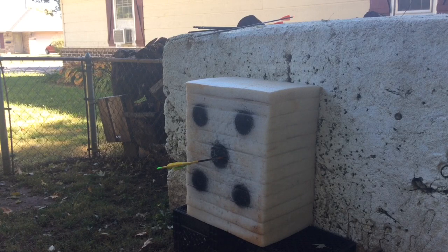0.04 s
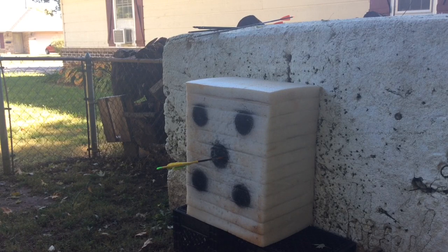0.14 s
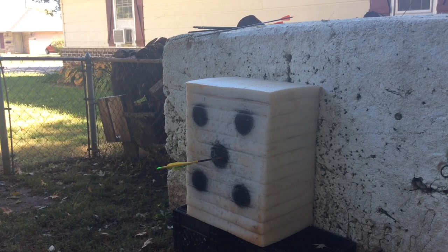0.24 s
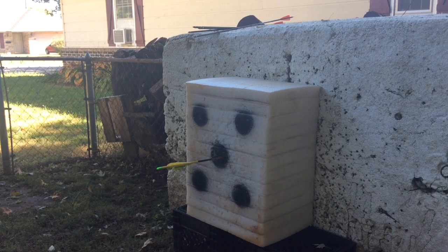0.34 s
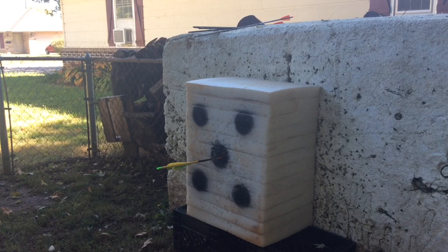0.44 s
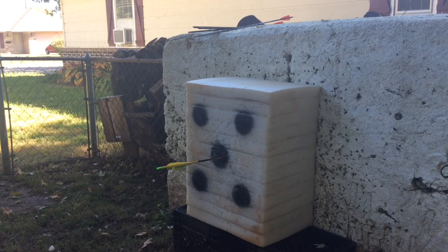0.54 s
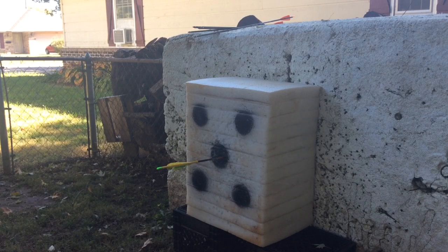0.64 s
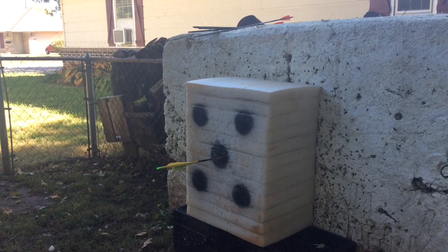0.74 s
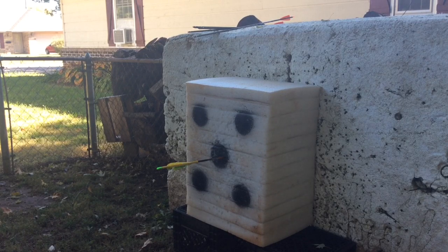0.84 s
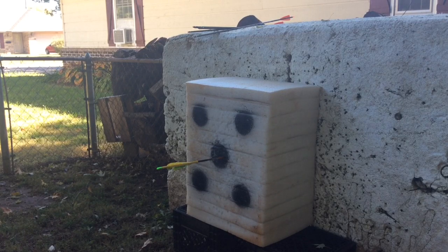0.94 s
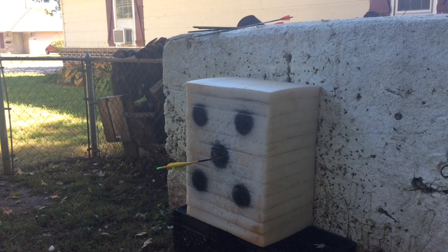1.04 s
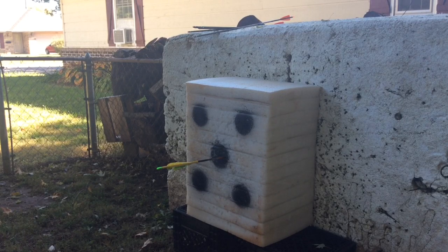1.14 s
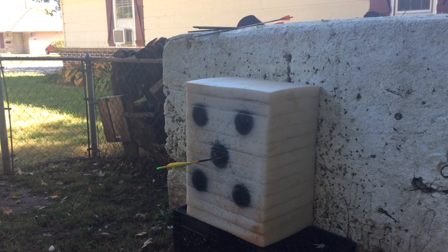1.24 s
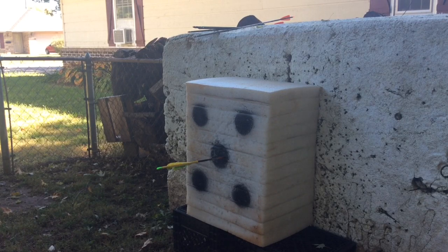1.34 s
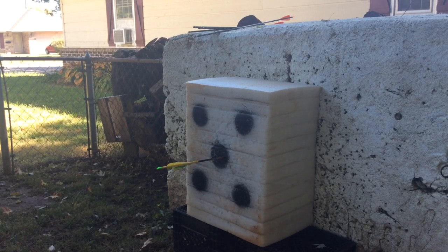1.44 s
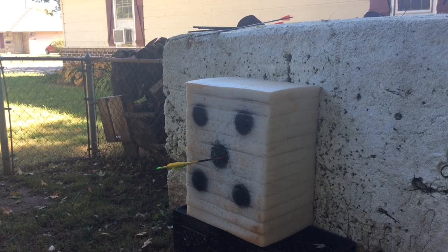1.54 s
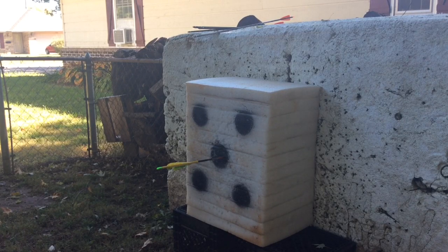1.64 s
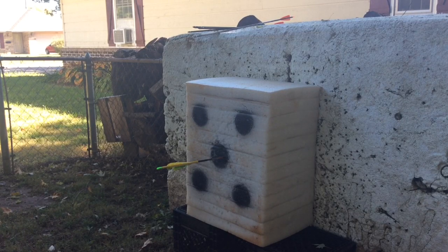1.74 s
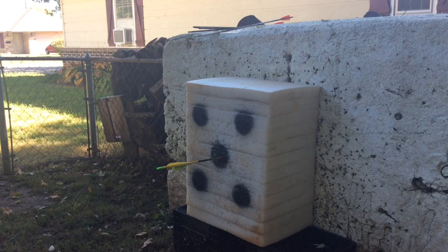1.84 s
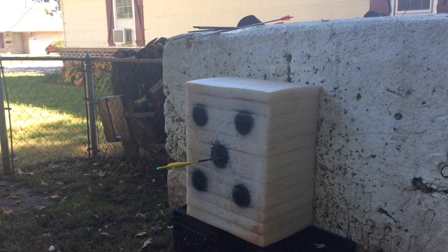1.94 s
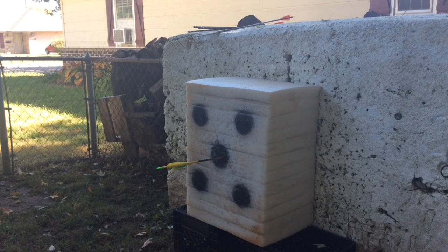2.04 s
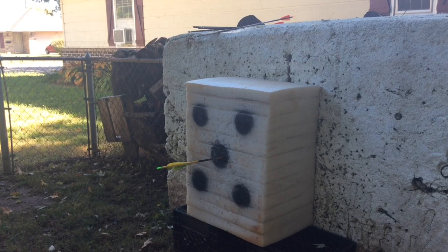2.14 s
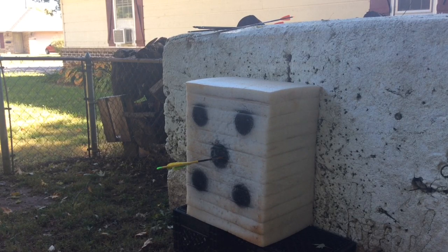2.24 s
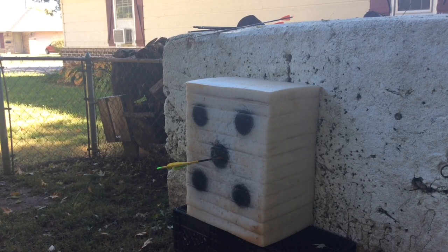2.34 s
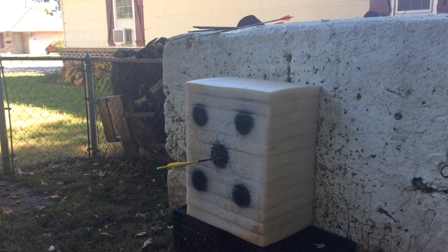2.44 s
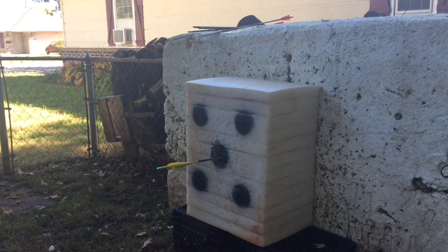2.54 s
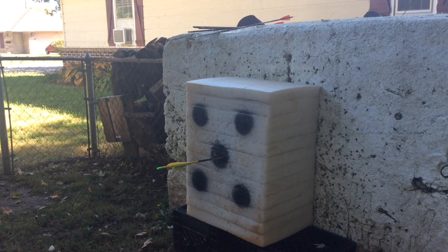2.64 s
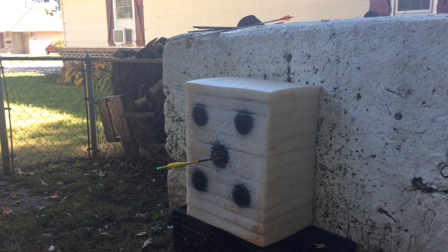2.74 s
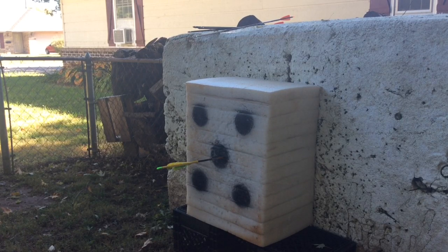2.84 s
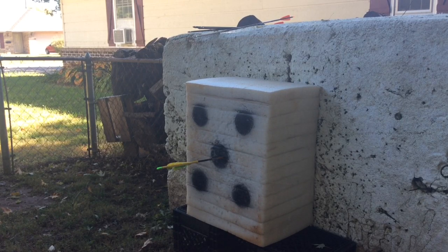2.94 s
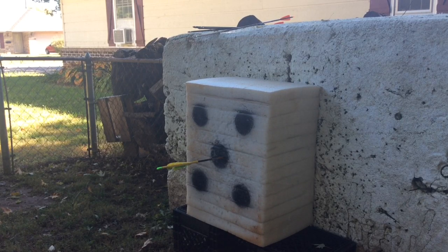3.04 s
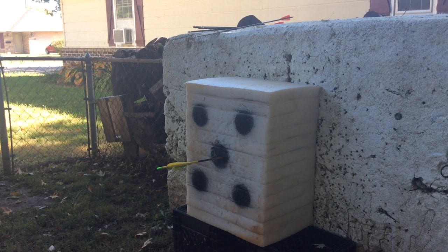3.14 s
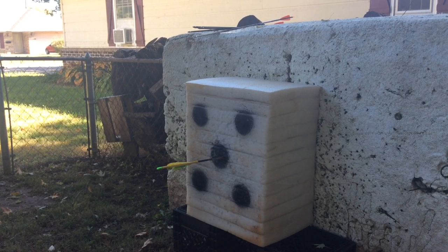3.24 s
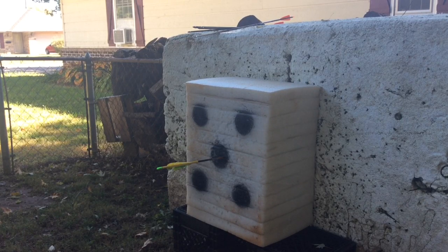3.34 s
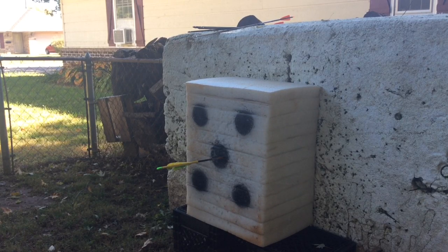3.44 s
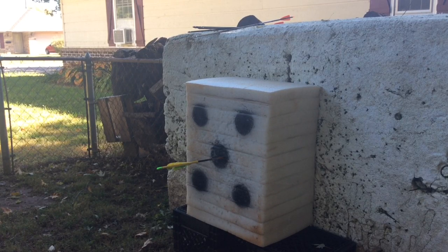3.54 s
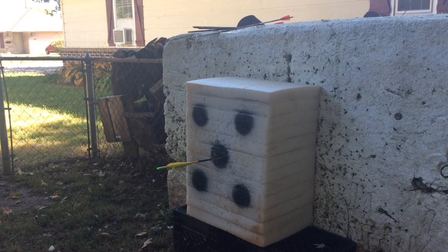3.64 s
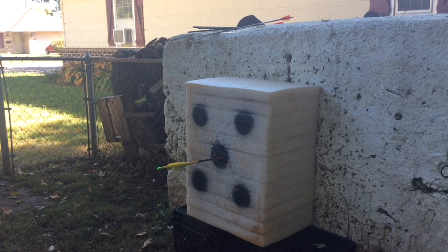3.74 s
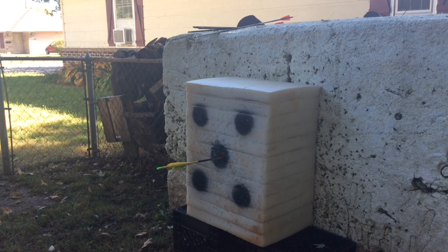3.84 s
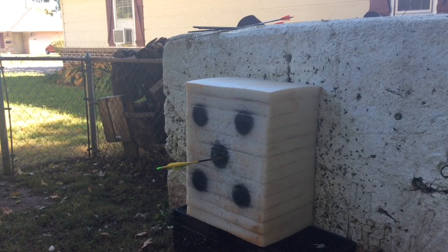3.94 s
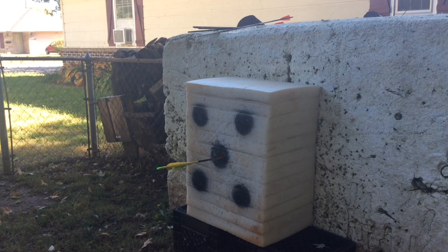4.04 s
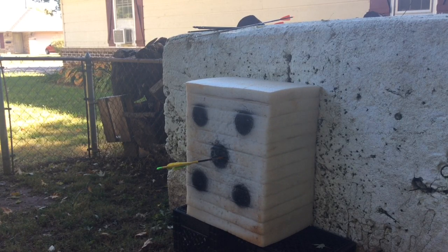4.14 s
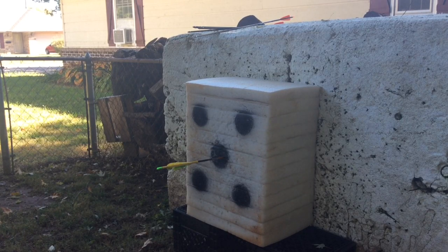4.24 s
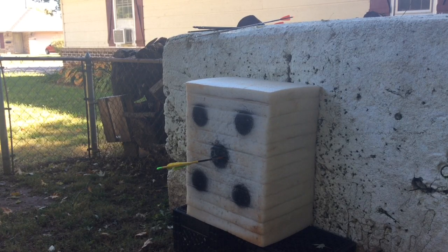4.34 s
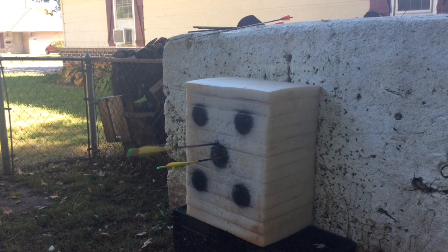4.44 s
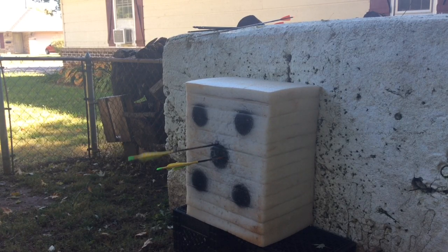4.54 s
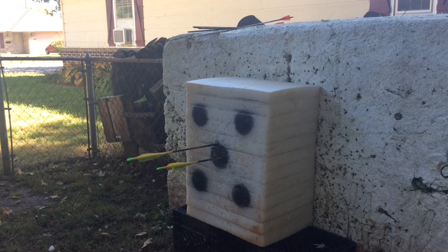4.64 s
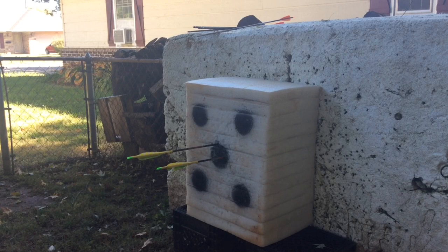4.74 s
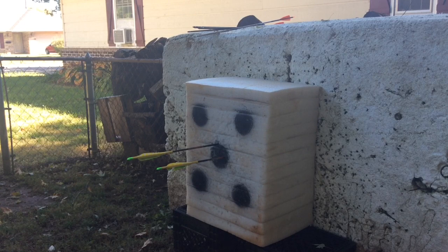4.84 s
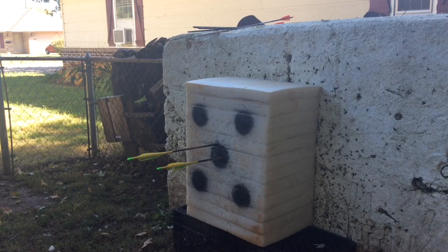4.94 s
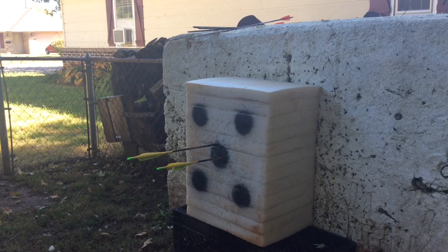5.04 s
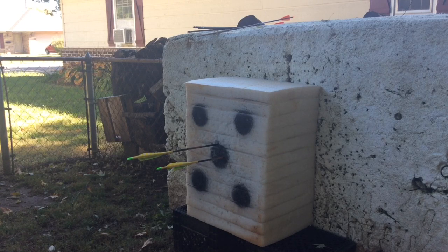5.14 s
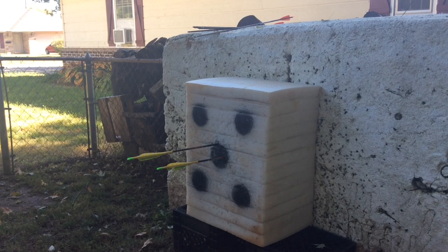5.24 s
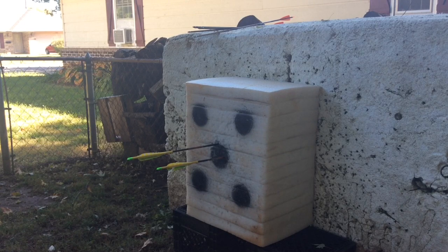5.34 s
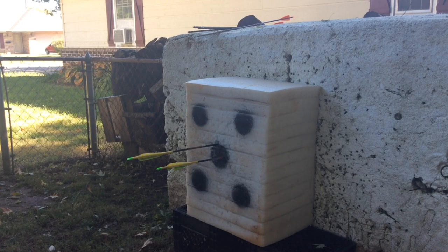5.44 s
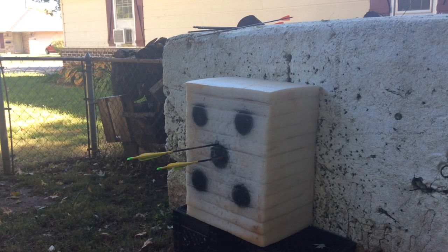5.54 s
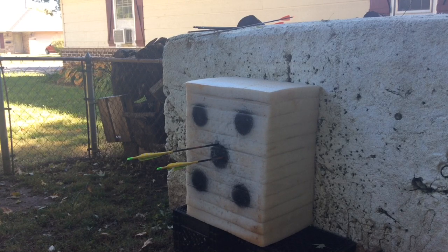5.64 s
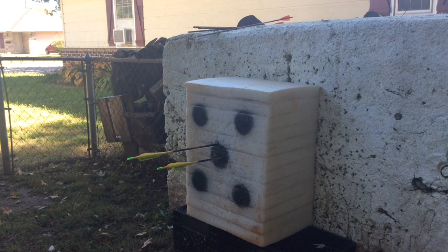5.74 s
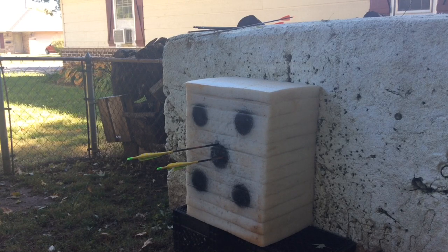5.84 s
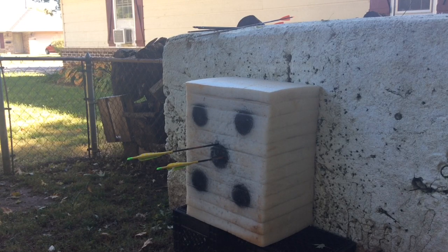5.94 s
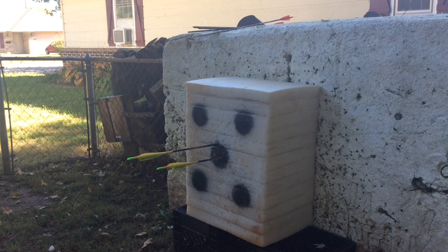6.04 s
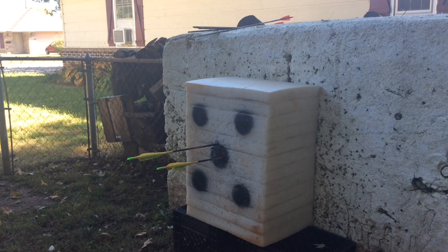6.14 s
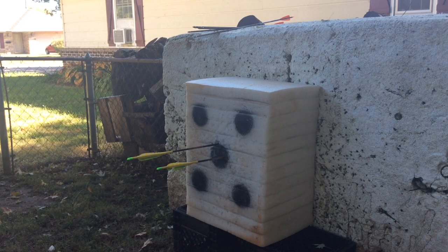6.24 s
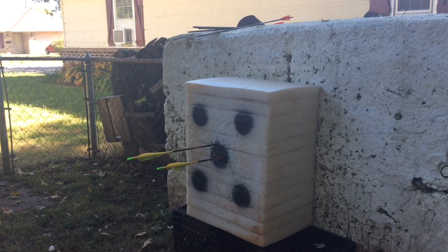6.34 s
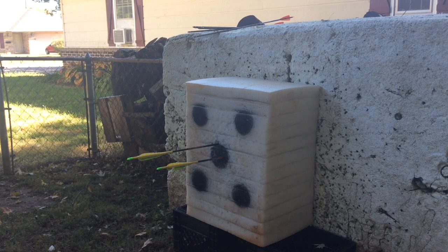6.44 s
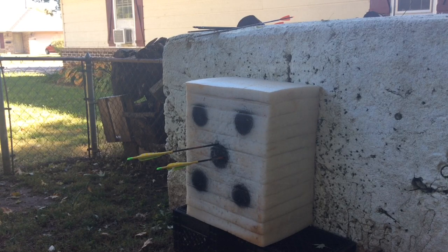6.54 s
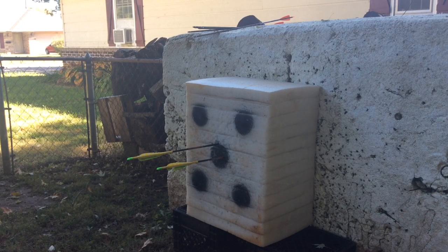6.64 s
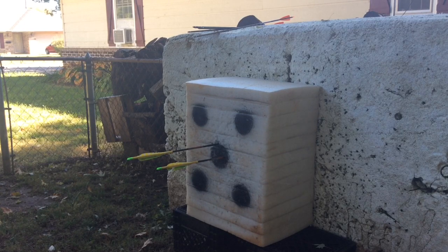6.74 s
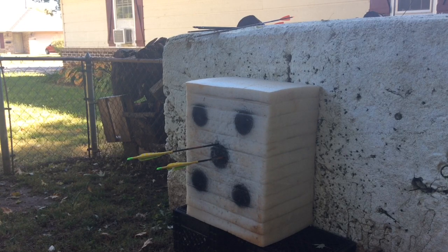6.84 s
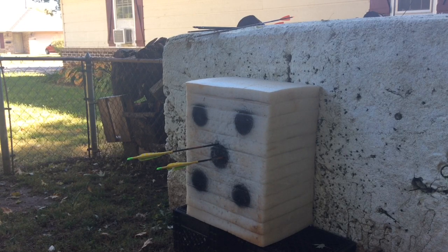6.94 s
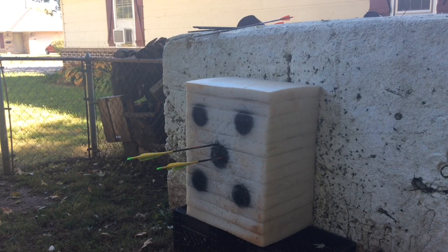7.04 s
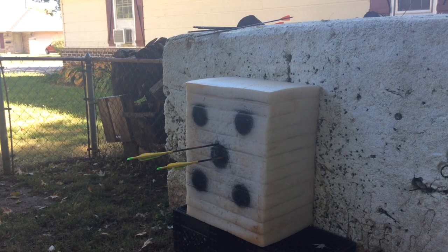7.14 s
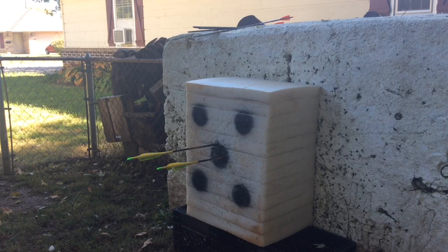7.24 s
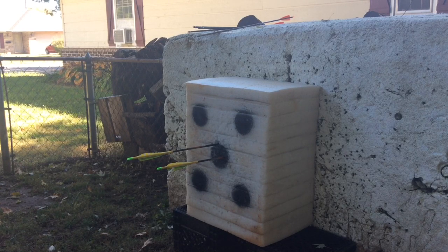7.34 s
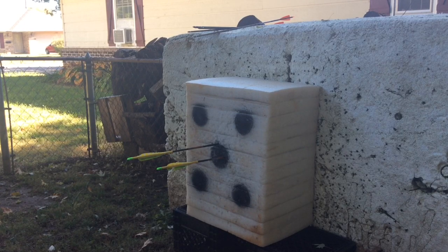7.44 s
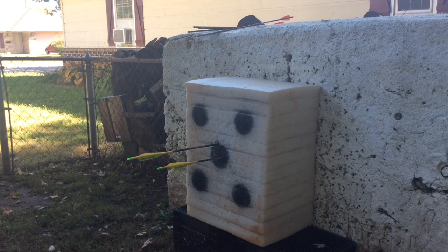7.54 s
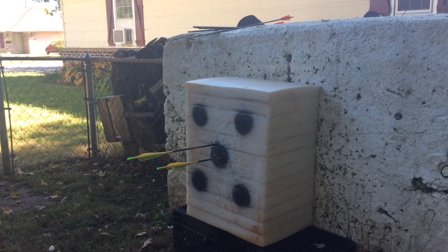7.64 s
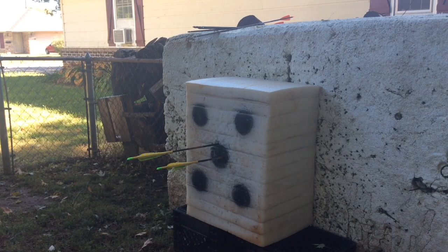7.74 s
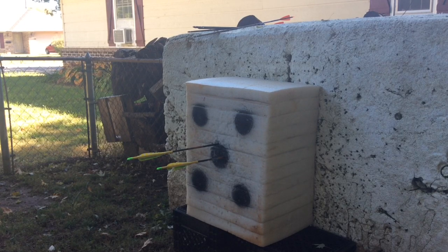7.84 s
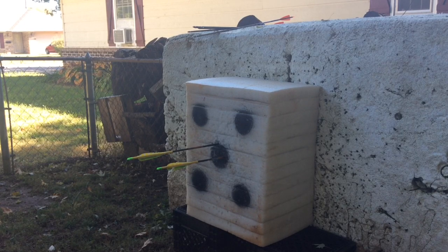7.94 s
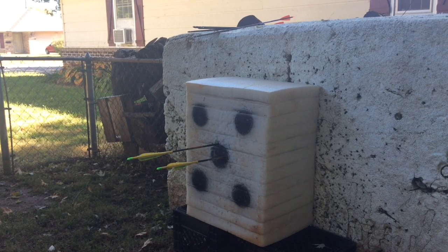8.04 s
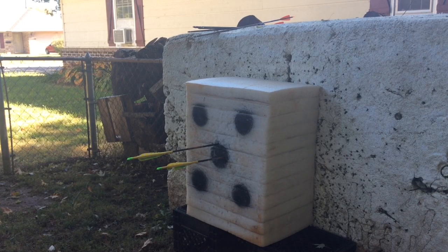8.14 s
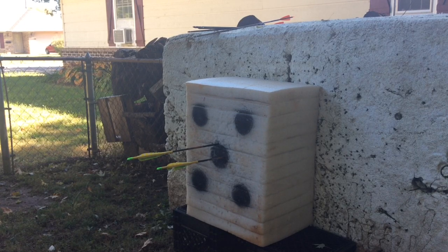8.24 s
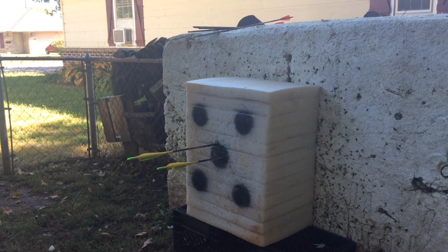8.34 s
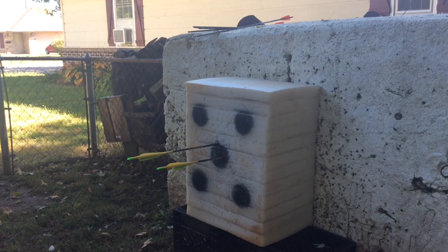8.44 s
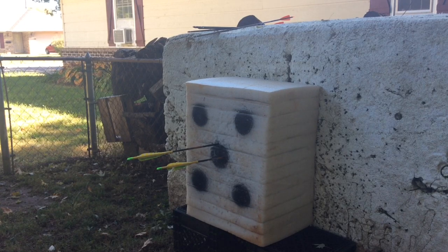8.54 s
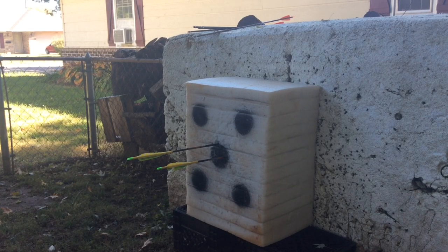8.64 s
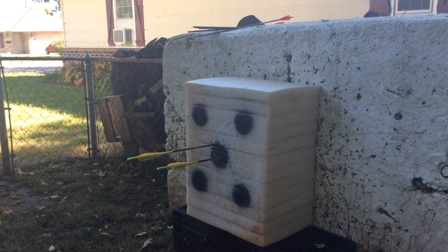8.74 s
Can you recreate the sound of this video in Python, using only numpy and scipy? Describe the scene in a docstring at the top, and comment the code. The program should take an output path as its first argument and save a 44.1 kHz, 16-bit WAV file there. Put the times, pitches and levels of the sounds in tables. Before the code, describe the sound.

Crickets trill over faint distant traffic, then a bowstring slaps and an arrow slams into a foam block with a loud, overloaded thwack.

```python
"""Crickets trill near and far over distant traffic, as bands of modulated noise and pulsed tones; dry leaves rustle.
A bow is loosed: string slaps ring the limbs, then the arrow comes in as vane hiss and shaft hum.
It thumps into a layered foam block beside the microphone: the tip cracks the skin and rings the shaft, then the
braking shoves boom the block, overloading the recorder. Yard clutter and house walls answer, and leaves rustle again."""
import sys
import numpy as np
from scipy import signal
from scipy.fft import rfft, irfft, next_fast_len
from scipy.io import wavfile
from scipy.ndimage import uniform_filter1d

SR = 44100
rng = np.random.default_rng(int(sys.argv[2]) if len(sys.argv) > 2 else 0)


def waveform_to_disk(signal):
    """Save audio, clipped to [-1, 1], as 16-bit WAV at the path in sys.argv[1]."""
    frames = np.transpose(np.atleast_2d(signal))
    scaled = np.clip(frames, -1, 1) * 32767
    samples = np.round(scaled).astype(np.int16)
    wavfile.write(sys.argv[1], SR, samples)


def undo_db(level):
    """Turn decibels back into plain size, where 20 dB means ten times bigger."""
    steps = np.asarray(level, float) / 20
    return 10 ** steps


N = 387633
T = np.arange(N) / SR
FFT_LENGTH = next_fast_len(N)

# tip breaking through the skin and first layers: start_s [s], level_db [dB]
TIP_BLOWS = [(4.5309, -10), (4.533, 0.2)]
# shaft modes: frequency_hz [Hz], level_db [dB], t60_s [s]
SHAFT_MODES = [(1080, 1, 0.014), (1250, -10.5, .012), (1660, -3, 0.01), (2030, -3, 0.0092),
               (2720, -1, 0.0086), (3270, -4, 0.006), (4280, 2, 0.0096), (5240, -14, 0.0073),
               (7550, -12, 0.0068), (9200, -14, 0.005), (10800, -15, 0.0043), (13500, -21, 0.004)]
# shoves as the arrow brakes and the block rocks: start_s [s], level_db [dB], contact_ms [ms]
BLOCK_SHOVES = [(4.5362, -3.5, 1.62), (4.5395, -1, 1.33), (4.5426, -4, 0.79), (4.5449, -1.5, 0.17),
                (4.580, -19.5, 2.5), (4.599, -17, 3.6)]
# foam block modes: frequency_hz [Hz], level_db [dB], t60_s [s]
BLOCK_MODES = [(138, -15, .16), (170, 2.5, 0.11), (223.6, -5, 0.077), (265, -7.5, 0.043), (323, -4, 0.048),
               (441, 0, 0.027), (544, -0.5, 0.036), (684, -2, .035), (830, -21.5, .03),
               (1006, -19.5, 0.027), (1640, -6.5, .02)]


def impact():
    """Modal excitation: short forces ring the shaft and boom the block, while fracture and tearing make noise."""
    tip_force = sum(push(start_s, level_db, 0.071) for start_s, level_db in TIP_BLOWS)
    shove_force = sum(push(start_s, level_db, ms) for start_s, level_db, ms in BLOCK_SHOVES)
    shaft = ring(tip_force, SHAFT_MODES)
    block = ring(shove_force, BLOCK_MODES)
    # noise spectra: (Hz, relative dB per Hz)
    crack_noise = coloured([(300, -0.5), (1500, 5), (5000, -0.5), (15500, -15.5)])
    tear_noise = coloured([(150, -22), (600, 11), (1200, -10.5), (3000, -23), (15500, -38.5)])
    crack = burst(TIP_BLOWS[0][0], -2.5, 0.0002, 0.0071) * crack_noise
    tear = burst(BLOCK_SHOVES[0][0], -11, 0.004, 0.085) * tear_noise
    # a small block radiates its slowest motion poorly
    body = highpass(highpass(shaft + block + tear, 133), 115)
    return body + crack


# arrow in flight: time_s [s], hiss_db [dB], hum_hz [Hz], hum_db [dB]
ARROW_FLIGHT = [(4.41, -56, 488, -57), (4.426, -38, 484, -40.5), (4.482, -42, 487, -45),
                (4.5, -36.5, 454, -42), (4.518, -39, 432, -38), (4.527, -27.5, 434, -40)]
# vane hiss spectrum: frequency_hz [Hz], density_db [relative dB per Hz]
VANE_SPECTRUM = [(600, 2.5), (1500, -9.5), (3000, -6), (5000, -7.5), (9000, -6.5), (15000, -6.5)]


def flight():
    """Aeroacoustic noise and flexural vibration: vanes hiss, and the shaft hums lower as it nears."""
    hum_phase = 2 * np.pi * np.cumsum(curve(ARROW_FLIGHT, column=2)) / SR
    hum = undo_db(curve(ARROW_FLIGHT, column=3)) * np.sin(hum_phase)
    hiss_db = curve(ARROW_FLIGHT, column=1) + 1.3 * walk(60)
    hiss = undo_db(hiss_db) * coloured(VANE_SPECTRUM)
    return (hum + hiss) * inside(ARROW_FLIGHT, 0.004)


# string slaps at the release: start_s [s], thunk_db [dB], hiss_db [dB], contact_ms [ms]
STRING_SLAPS = [(4.382, -43, -49, .2), (4.393, -34, -34.5, 0.3), (4.399, -23.5, -28, 0.36),
                (4.4034, -30, -31, 0.22), (4.4087, -31, -37, 0.14), (4.4127, -26.5, -45.5, 0.97)]
# bow modes: frequency_hz [Hz], level_db [dB], t60_s [s]
BOW_MODES = [(60, 1.5, .1), (135.3, 5, 0.055), (210, -4.5, 0.033), (474, -18, .12), (830, -30, .15),
             (2130, -17, .05), (2680, -2, 0.054), (3870, -3, .02)]
# slap hiss spectrum: frequency_hz [Hz], density_db [relative dB per Hz]
STRING_SPECTRUM = [(700, -3.5), (2500, -1.5), (4000, -0.5), (8000, -3.5), (12000, -5), (15500, -20.5)]


def bow():
    """Impulsive modal excitation: the string slaps the limbs with a dull thunk, a twang and puffs of hiss."""
    slap_force = sum(push(start_s, thunk_db, ms) for start_s, thunk_db, _, ms in STRING_SLAPS)
    thunk = ring(slap_force, BOW_MODES)
    puffs = sum(burst(start_s, hiss_db, 0.00084, 0.078) for start_s, _, hiss_db, _ in STRING_SLAPS)
    return highpass(thunk, 70) + puffs * coloured(STRING_SPECTRUM)


# near clutter tails: lowest_hz [Hz], level_db [dB], t60_s [s]
CLUTTER_TAILS = [(350, -28.5, 0.41), (1800, -26.5, 0.15), (7000, -12.5, 0.16)]
# house wall echoes: delay_s [s], level_db [dB], brightest_hz [Hz]
WALL_ECHOES = [(.030, -34.5, 5000), (0.051, -38, 5000), (0.166, -23.5, 200), (.167, -46, 2500),
               (.208, -49, 2500), (.225, -51, 210)]


def yard(source):
    """Reflection and scattering: near clutter gives short bright tails, house walls late dull slaps."""
    out = source
    for lowest_hz, level_db, t60_s in CLUTTER_TAILS:
        out = out + undo_db(level_db) * highpass(scatter(source, t60_s), lowest_hz)
    for delay_s, level_db, brightest_hz in WALL_ECHOES:
        delayed = np.roll(source, int(delay_s * SR))
        out = out + undo_db(level_db) * lowpass(delayed, brightest_hz)
    return out


# near trills, a neighbour overlapping the first:
# first_stroke_middle_s [s], end_s [s], pitch_hz [Hz], level_db [dB]
NEAR_TRILLS = [(.0556, .6, 3910, -52), (.068, .5, 3774, -56), (1.0668, 1.12, 3870, -53),
               (1.191, 1.49, 3920, -49.5), (2.109, 2.54, 3848, -48.5), (3.2502, 3.64, 3905, -50.5),
               (4.8322, 5.25, 3925, -51.5), (7.0186, 7.43, 3886, -50.5), (8.65, 8.9, 3920, -52.5)]


def near_crickets():
    """Stridulation: distinct wing strokes pulse a tone, slowing through each trill as the insect tires."""
    strokes_per_s, slowing_per_s2, stroke_duty = 40.5, 4, 0.6
    swell_s, first_share, fade_s = 0.1, 0.85, 0.06
    song = 0
    for first_s, end_s, pitch_hz, level_db in NEAR_TRILLS:
        t = np.maximum(T - first_s, -1)
        phase = strokes_per_s * t - slowing_per_s2 * t ** 2 / 2 + stroke_duty / 2
        swell = np.clip(first_share + t / swell_s, 0, 1)
        fade = np.clip((end_s - T) / fade_s + 0.5, 0, 1)
        pulses = strokes(phase, pitch_hz, stroke_duty, 1.7, 25, 150)
        song = song + (phase > 0) * swell * fade * undo_db(level_db) * pulses
    return song + undo_db(2.0) * blur(song, curve(NEAR_TRILLS, column=2), 220, 0.081)


# far trills: start_s [s], end_s [s], pitch_hz [Hz], level_db [dB]
DISTANT_TRILLS = [(-.1, .42, 4150, -53), (.86, 1.33, 4150, -60), (1.56, 2.38, 4150, -57.5),
                  (2.86, 3.48, 4180, -59), (3.74, 4.15, 4110, -55), (4.7, 5.22, 4150, -58.5),
                  (5.68, 6.05, 4150, -53.5), (6.65, 6.98, 4205, -55.5), (7.15, 7.38, 4090, -62),
                  (7.58, 8.18, 4150, -55), (8.6, 8.9, 4150, -56)]


def far_crickets():
    """Stridulation with long scattering: the song swells, its strokes run together and it is blurred more."""
    strokes_per_s, swell_s, fade_db_per_s = 48, 0.092, 147
    envelope = 0
    for start_s, end_s, _, level_db in DISTANT_TRILLS:
        swell = np.clip((T - start_s) / swell_s, 0, 1)
        envelope = envelope + swell * undo_db(level_db - fade_db_per_s * np.maximum(T - end_s, 0))
    pitch_hz = curve(DISTANT_TRILLS, column=2)
    phase = np.cumsum(strokes_per_s + 1.6 * walk(3.6)) / SR
    song = envelope * undo_db(1.5 * walk(6.4)) * strokes(phase, pitch_hz, 0.99, 1.6, 9.1, 75)
    return song + undo_db(1.5) * blur(song, pitch_hz, 180, 0.27)


def cricket_chorus():
    """Incoherent superposition: many crickets farther still merge into a wavering narrow band."""
    pitch_hz, width_hz, level_db = 4150, 520, -67.5
    return blur(undo_db(level_db + 3.2 * walk(3.07)), np.full(N, pitch_hz), width_hz, 0.2)


# dry leaves rustling: start_s [s], level_db [dB], rise_s [s], t60_s [s], tilt_db [dB per octave]
LEAF_RUSTLES = [(.787, -40, .007, 0.066, 2), (.801, -40.5, 0.0037, 0.094, -2.5), (5.475, -49, .02, .14, 3),
                (5.53, -47.5, .015, 0.16, 3), (5.585, -49, .015, .12, 1)]
# leaf spectrum before tilting: frequency_hz [Hz], density_db [relative dB per Hz]
LEAF_SPECTRUM = [(700, -16), (1200, 4), (1700, -6), (2400, 1), (5000, -6), (10000, -10), (15500, -26)]


def leaves():
    """Granular friction noise: short rustles of tilted colour, roughened by fast level changes."""
    out = 0
    for start_s, level_db, rise_s, t60_s, tilt_db in LEAF_RUSTLES:
        colour = [(hz, db + tilt_db * np.log2(hz / 2500)) for hz, db in LEAF_SPECTRUM]
        out = out + burst(start_s, level_db, rise_s, t60_s) * coloured(colour)
    return out * undo_db(3.2 * walk(600))


# faint wavering hums and one brief blip in the background:
# start_s [s], end_s [s], start_hz [Hz], end_hz [Hz], level_db [dB]
HUM_WAVERS = [(0.162, 0.332, 197.7, 206.7, -46.5), (1.712, 2.199, 220.5, 223, -53),
              (2.8, 3.603, 128.5, 134.8, -52.5), (5.693, 6.9, 239.8, 245.2, -56.5),
              (7.095, 8.792, 143.1, 155.5, -49), (8.3, 8.79, 248, 250, -57.5),
              (3.585, 3.596, 670, 676, -52)]


def hums():
    """Frequency and amplitude modulation: faint tones glide and waver."""
    out = 0
    for start_s, end_s, start_hz, end_hz, level_db in HUM_WAVERS:
        pitch_hz = np.interp(T, [start_s, end_s], [start_hz, end_hz]) + 1.49 * walk(6.4)
        tone = np.sin(2 * np.pi * np.cumsum(pitch_hz) / SR)
        out = out + inside([[start_s], [end_s]], 0.043) * undo_db(level_db + 1.1 * walk(8.5)) * tone
    return out


# traffic and air spectrum: frequency_hz [Hz], density_db [relative dB per Hz]
TOWN_SPECTRUM = [(15, -58.5), (25, -26.5), (38, -14), (86, -1.5), (141, -2.5), (179, -5.5), (255, -12),
                 (299, -13), (392, -14.5), (572, -22), (749, -19.5), (1870, -29.5), (2590, -29),
                 (5670, -31.5), (15800, -40.5)]
# slow relative level changes: time_s [s], rumble_db [dB], hiss_db [dB]
TOWN_DRIFT = [(0, 0, 0.5), (2, -1.5, 0.5), (3.6, -0.5, 0), (5, 0, -0.5), (7, -1, -1), (8.79, -1, -1.5)]


def town():
    """Band-modulated noise: traffic rumble swells octave by octave under a smoother hiss."""
    spectrum = rfft(coloured(TOWN_SPECTRUM), FFT_LENGTH)
    octave = np.log2(np.maximum(np.fft.rfftfreq(FFT_LENGTH, 1 / SR), 20) / 20)
    out, swell = 0, walk(0.6)
    for k in range(11):
        band = irfft(spectrum * np.clip(1 - np.abs(octave - k), 0, 1), FFT_LENGTH)[:N]
        low = np.clip((7 - k) / 3, 0, 1)  # the bass wanders, the treble stays smooth
        drift_db = low * curve(TOWN_DRIFT, column=1) + (1 - low) * curve(TOWN_DRIFT, column=2)
        wander_db = low * (0.2 * swell + 0.68 * walk(5.1)) + 0.14 * walk(9.6)
        out = out + band * undo_db(drift_db + wander_db)
    return undo_db(-45.5) * out


def push(start_s, level_db, contact_ms):
    """Impulse of contact: a half-sine force whose area is set by the level, 1 at 0 dB."""
    u = np.clip((T - start_s) / (contact_ms / 1000), 0, 1)
    return undo_db(level_db) * np.sin(np.pi * u) * np.pi / (2 * contact_ms / 1000 * SR)


def ring(force, modes):
    """Modal superposition: a force convolved with a sum of decaying sines."""
    t = T[:SR // 2]
    body = sum(undo_db(db) * np.sin(2 * np.pi * hz * t) * 1000. ** (-t / t60_s) for hz, db, t60_s in modes)
    return signal.oaconvolve(force, body)[:N]


def burst(start_s, level_db, rise_s, t60_s):
    """Transient envelope: a quick rise and an exponential fall."""
    t = np.maximum(T - start_s, 0)
    return undo_db(level_db) * (1 - np.exp(-t / rise_s)) * 1000. ** (-t / t60_s)


def strokes(phase, pitch_hz, duty, scatter_db, waver_hz, glide_hz):
    """Pulsed resonance: one falling tone a cycle, varied in strength and pitch, plus a faint third partial."""
    cycle = np.floor(phase).astype(int)
    chance = rng.standard_normal((400, 2))[cycle % 400]
    stroke = np.clip((phase - cycle) / duty, 0, 1)
    stroke_hz = pitch_hz + waver_hz * chance[:, 1] + glide_hz * (0.5 - stroke)
    turn = 2 * np.pi * np.cumsum(stroke_hz) / SR
    tone = np.sin(turn) + undo_db(-19) * np.sin(3 * turn)
    return np.sin(np.pi * stroke) * undo_db(scatter_db * chance[:, 0]) * tone


def blur(song, pitch_hz, width_hz, t60_s):
    """Diffuse reflection off stirring leaves: the song's power lingers as a rough narrow band on its pitch."""
    keep = 1000. ** (-2 / (t60_s * SR))
    power = signal.lfilter([1 - keep], [1, -keep], song ** 2)
    turn = 2 * np.pi * np.cumsum(pitch_hz) / SR
    return np.sqrt(np.abs(power)) * (walk(width_hz) * np.sin(turn) + walk(width_hz) * np.cos(turn))


def scatter(source, t60_s):
    """Diffuse reverberation: dense random reflections from fence, leaves and ground."""
    t = T[:SR // 3]
    tail = rng.standard_normal(len(t)) * 1000. ** (-t / t60_s)
    return signal.oaconvolve(source, tail / np.sqrt(np.sum(tail ** 2)))[:N]


def coloured(points):
    """Spectral shaping: noise of rms 1 following (Hz, relative dB) points."""
    hz, db = np.transpose(points)
    f = np.maximum(np.fft.rfftfreq(FFT_LENGTH, 1 / SR), 1)
    gain = undo_db(np.interp(np.log(f), np.log(hz), db))
    noise = irfft(rfft(rng.standard_normal(FFT_LENGTH)) * gain, FFT_LENGTH)[:N]
    return noise / noise.std()


def walk(rate):
    """Random modulation: levels held 1 / rate s and slewed twice, with a spread near 1."""
    k = int(SR / rate)
    held = np.repeat(rng.standard_normal(N // k + 1), k)
    return 1.1 * uniform_filter1d(uniform_filter1d(held, k), k)[:N]


def curve(rows, column):
    """Linear interpolation: one column of a table over time."""
    return np.interp(T, [row[0] for row in rows], [row[column] for row in rows])


def inside(rows, fade_s):
    """Gating: 1 while a table lasts, fading to 0 outside."""
    return np.clip(np.minimum(T - rows[0][0], rows[-1][0] - T) / fade_s + 1, 0, 1)


def lowpass(x, hz):
    """Low-pass filtering: steep treble loss."""
    return signal.sosfilt(signal.butter(4, min(hz, 0.45 * SR), fs=SR, output="sos"), x)


def highpass(x, hz):
    """High-pass filtering: bass loss."""
    return signal.sosfilt(signal.butter(2, hz, "high", fs=SR, output="sos"), x)


def scene():
    """Linear superposition: everything that reaches the microphone."""
    shot = yard(impact() + flight() + bow())
    crickets = near_crickets() + far_crickets() + cricket_chorus()
    return (shot + crickets + leaves() + hums() + town())[None]


def low_pass(x):
    """Removes everything above the highest recorded frequency."""
    return signal.sosfilt(signal.butter(12, 16410, fs=SR, output="sos"), x)


def record(dry):
    """Band limiting and clipping: the microphone rolls off the top; the blow is cut flat at full scale."""
    heard = signal.sosfilt(signal.ellip(10, 0.2, 50, 15750, fs=SR, output="sos"), dry)
    return low_pass(np.clip(heard, -1, 1))


dry = scene()
out = record(dry)
waveform_to_disk(out)
```